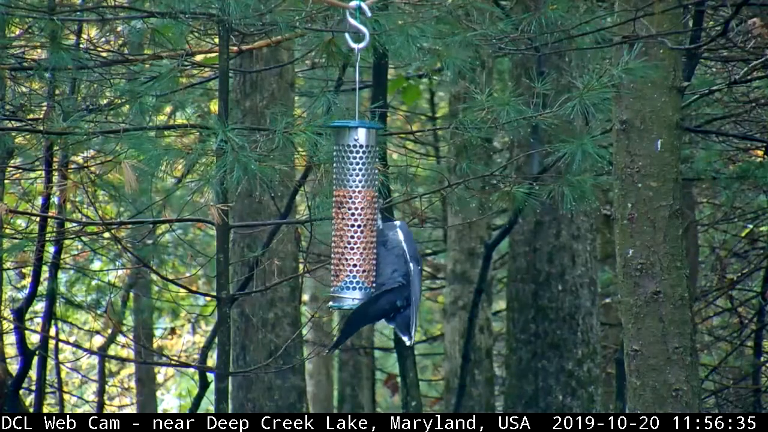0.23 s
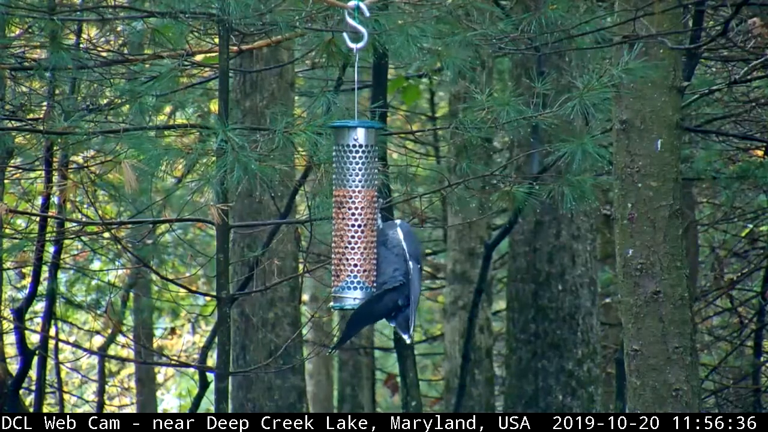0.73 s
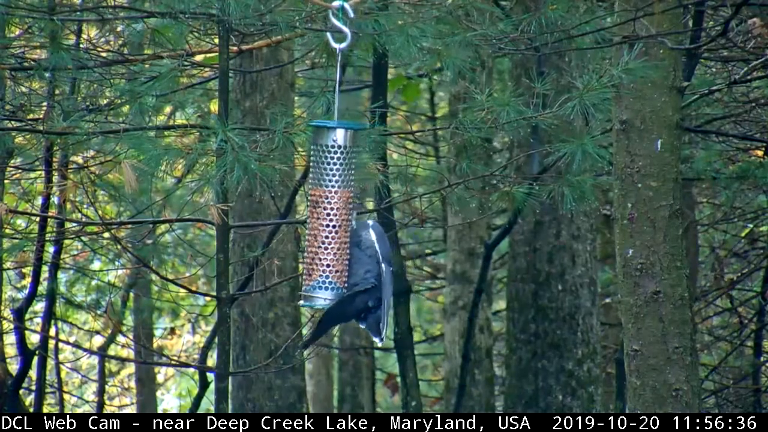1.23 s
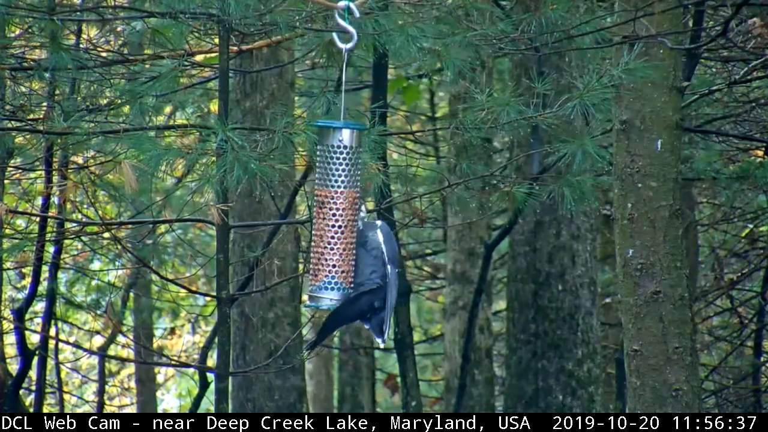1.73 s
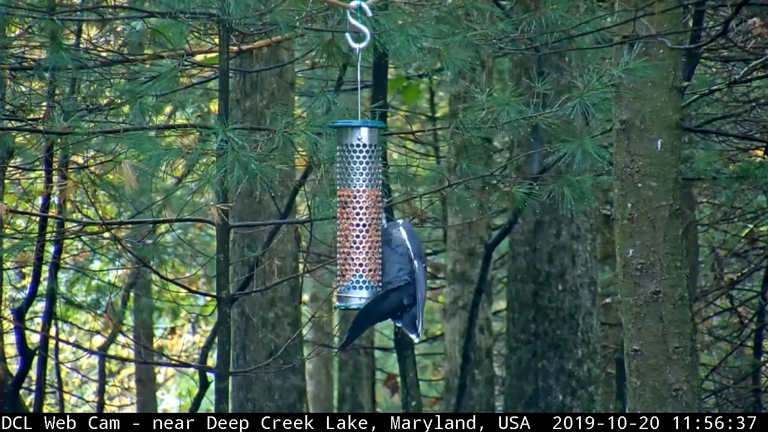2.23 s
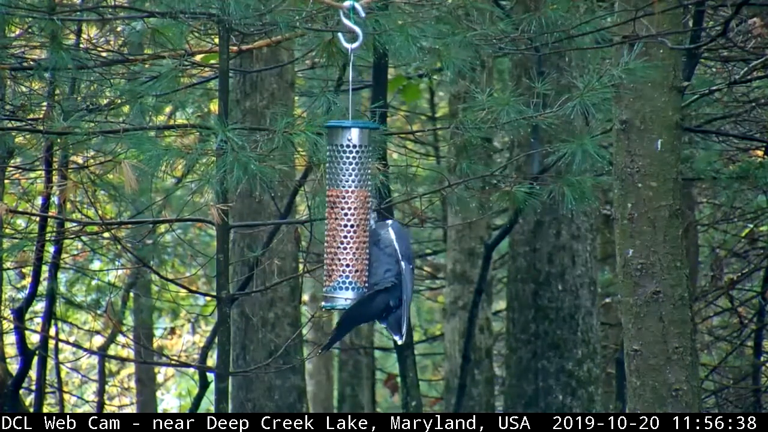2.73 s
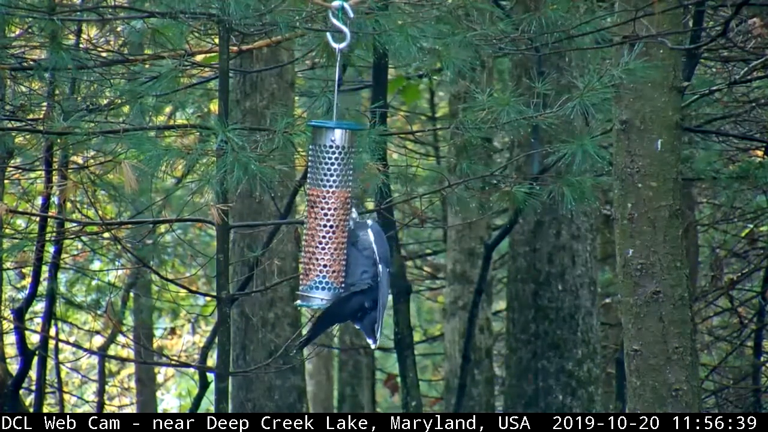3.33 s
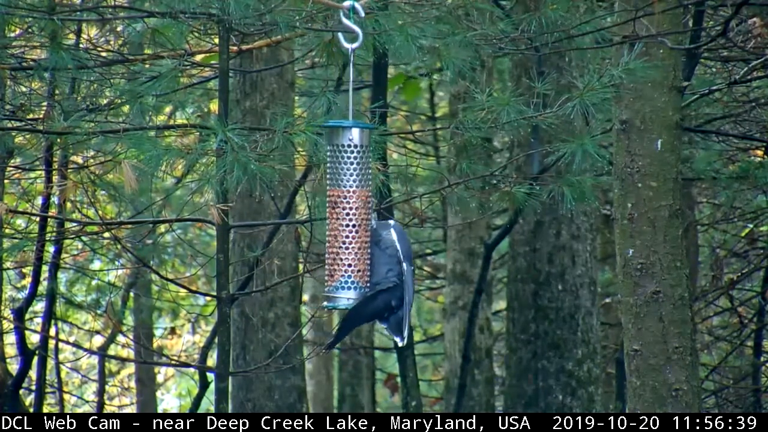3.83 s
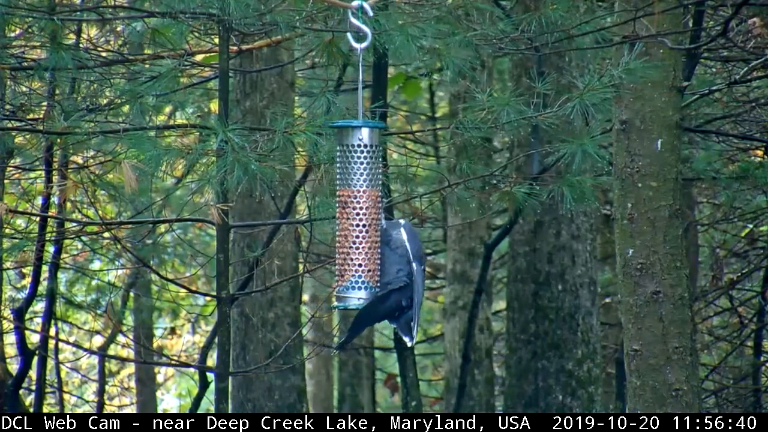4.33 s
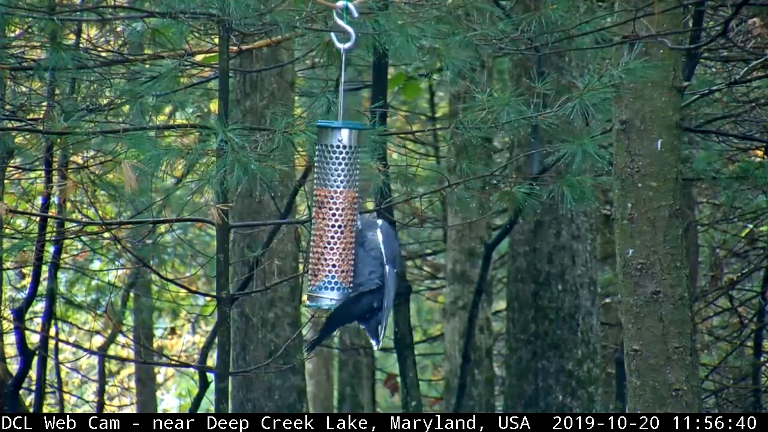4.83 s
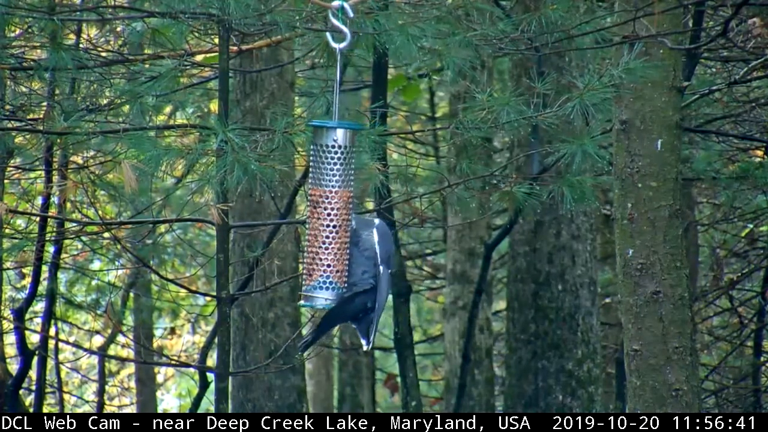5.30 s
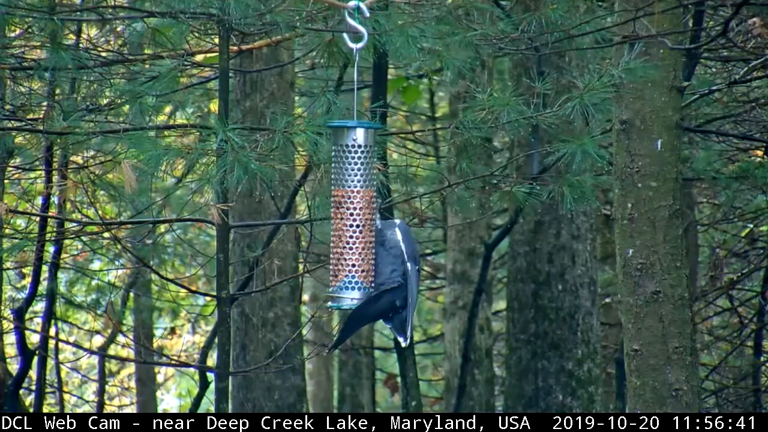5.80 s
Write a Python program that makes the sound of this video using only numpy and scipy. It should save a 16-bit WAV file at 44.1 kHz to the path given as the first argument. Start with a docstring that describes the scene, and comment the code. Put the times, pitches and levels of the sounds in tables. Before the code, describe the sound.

In a quiet wood, a woodpecker clinging to a metal mesh feeder pecks irregularly at pellets. One sharp metallic click stands out near one second, with mostly faint crunchy ticks and claw scrapes afterwards. Two clear, thin, falling chips from a small bird echo off the trunks around three and four seconds. A firm peck comes at the end. A steady low hum, rumble and soft hiss lie beneath, heard through a slightly dull single microphone.

```python
"""A woodpecker on a metal mesh feeder pecks at pellets and shuffles its grip in a quiet wood:
strikes ring damped modes and crumble noise, scrapes are runs of tiny slips, loose pellets clatter.
A small bird gives thin, falling chips, gliding tones that the tree trunks throw back.
Under it lie low rumble and hiss of shaped noise, and a low hum with a thin whine.
One band-limited microphone channel feeds both sides."""
import sys
import numpy as np
from scipy import signal
from scipy.fft import rfft, irfft
from scipy.io import wavfile

SR = 44100
rng = np.random.default_rng(int(sys.argv[2]) if len(sys.argv) > 2 else 0)


def wrap_up_sound(samples):
    """Save the sound to the file named by the first command line argument, as 16-bit audio."""
    columns = np.atleast_2d(samples).T
    # keep every value between -1 and 1, then stretch to whole-number steps
    tamed = np.clip(columns, -1, 1)
    steps = np.round(tamed * 32767).astype(np.int16)
    wavfile.write(sys.argv[1], SR, steps)


N = 267290


def amp(db):
    """Decibels to gain."""
    return 10 ** (np.asarray(db) / 20)


def evened(x):
    """Scales to rms 1."""
    return x / np.sqrt(np.mean(x ** 2) + 1e-20)


def add(mix, start_s, sound):
    """Mixes a sound in at start_s, cut at the end of the mix."""
    part = mix[max(round(start_s * SR), 0):][:len(sound)]
    part += sound[:len(part)]


def coloured(x, points):
    """Filters x by a curve of (f/Hz, gain/dB) points over log frequency, then scales to rms 1."""
    hz, db = np.transpose(points)
    bins_hz = np.fft.rfftfreq(len(x), 1 / SR) + 1  # +1 avoids log(0)
    gain = amp(np.interp(np.log(bins_hz), np.log(hz), db))
    return evened(irfft(rfft(x) * gain, len(x)))


def drift(rate_hz):
    """Random motion of rms 1: straight lines between rate_hz random knots per second."""
    t = np.arange(N) / SR
    knots = np.arange(0, t[-1] + 1, 1 / rate_hz)
    return evened(np.interp(t, knots, rng.standard_normal(len(knots))))


def scattered(start_s, end_s, per_s, level_db, spread_db=3):
    """Light contacts, one at random within each even slot: rows of (t/s, level/dB)."""
    slots = np.arange(start_s, end_s, 1 / per_s)
    late, size = rng.random((len(slots), 2)).T
    levels_db = level_db + spread_db * (2 * size - 1)
    return list(zip(slots + late / per_s, levels_db))


def pecks(crumble_s=0.00027):
    """Each strike crumbles a pellet and rings the damped mesh; the spot it lands on favours one pitch."""
    # bill strikes: t/s, ring level/dB, crunch level/dB, crunch t60/s, favoured f/Hz,
    # fall-off around it/(dB per octave)
    strikes = [(0.2526, -53, -45, 0.015, 6400, 24), (0.467, -50, -48, .026, 6640, 28),
               (.4965, -57, -53, .02, 5300, 13), (.8638, -57, -50.5, 0.05, 6600, 22),
               (1.0415, -61, -56, 0.16, 7000, 21), (1.0783, -48, -49, .02, 6000, 20),
               (1.0829, -21.5, -44, 0.065, 5800, 1.5), (2.128, -56, -49, .03, 6500, 7),
               (2.163, -60, -55.5, .035, 7200, 25), (3.354, -55, -48.5, 0.03, 3800, 14),
               (3.3857, -55, -50.5, 0.048, 2900, 8), (3.3895, -49, -46, .03, 5000, 7),
               (3.438, -58, -51.5, .04, 4700, 9), (3.544, -54, -45, .02, 6400, 22),
               (3.550, -58, -52, 0.065, 6200, 19), (3.845, -62, -57, 0.07, 6200, 23),
               (4.4986, -61, -57, .04, 6500, 16), (4.759, -62, -58.5, 0.073, 6200, 25),
               (4.938, -60, -55, 0.06, 6000, 15), (5.699, -58, -57, .03, 5700, 24),
               (5.779, -60, -56.5, .085, 6500, 24), (6.0472, -33, -41, 0.025, 6500, 27)]
    # modes of the mesh tube full of pellets, the briefest only a sharp click at the onset:
    # f/Hz, relative level/dB, t60/s
    mesh_modes = [(980, -18.5, 0.016), (1300, -11, 0.023), (1538, -11, 0.026), (1980, -13.5, 0.018),
                  (2760, -15, 0.014), (3140, -28, 0.026), (4180, -21.5, 0.014), (4460, -15, 0.035),
                  (4870, -1, 0.016), (5030, -7, 0.008), (5200, -20, 0.04), (5450, -10.5, 0.034),
                  (5780, -9, 0.022), (6045, -7.5, 0.03), (6150, 2.5, 0.0027), (6750, -15, 0.028),
                  (7230, -23, .03)]
    # colour of a pellet cracking under the bill: f/Hz, gain/dB
    crack_colour = [(300, -8.5), (1500, 1.5), (2700, -3.5), (3800, -5), (5300, 2), (6500, 2), (7700, -4)]
    # faint nibbling throughout
    ticks_per_s, tick_db, tick_t60_s, tick_hz, tick_focus_db_per_oct = 1.8, -65.5, .05, 6300, 27

    t = np.arange(SR // 8) / SR
    hz, db, t60_s = np.transpose(mesh_modes)
    signs = (-1) ** np.arange(len(hz))  # neighbouring modes swing in opposite directions
    decays = amp(-60 * t / t60_s[:, None])
    modes = signs[:, None] * np.sin(2 * np.pi * hz[:, None] * t) * decays
    ticks = [(s, level_db, level_db, tick_t60_s, tick_hz, tick_focus_db_per_oct)
             for s, level_db in scattered(0, N / SR, ticks_per_s, tick_db)]
    bins_hz = np.fft.rfftfreq(len(t), 1 / SR) + 1
    out = np.zeros(N)
    for s, ring_db, crunch_db, crunch_t60_s, spot_hz, focus in strikes + ticks:
        gains = amp(db - focus * abs(np.log2(hz / spot_hz)))
        ring = gains @ modes / np.linalg.norm(gains)
        spot_gain = amp(-focus * abs(np.log2(bins_hz / spot_hz)))
        grit = irfft(rfft(rng.standard_normal(len(t))) * spot_gain, len(t))
        onset = -np.expm1(-t / crumble_s)
        crunch = coloured(grit, crack_colour) * amp(-60 * t / crunch_t60_s) * onset
        add(out, s, amp(ring_db) * ring + amp(crunch_db) * crunch)
    return out


def scrapes(slips_per_s=4000, grit_db=-4):
    """Claws and bill on metal: a run of tiny slips over grit noise that starts quickly and fades."""
    # scrapes: t/s, length/s (peak at a third), level/dB
    slides = [(2.786, 0.035, -54), (2.814, 0.15, -61), (3.137, 0.031, -57.5), (3.418, 0.027, -56),
              (3.525, 0.15, -60.5), (3.829, 0.043, -57.5), (4.198, 0.023, -54.5), (4.323, 0.0157, -57),
              (4.495, 0.075, -58), (5.308, .04, -57.5), (5.411, 0.051, -60)]
    # colour of a scrape: f/Hz, gain/dB
    scrape_colour = [(400, -3.5), (1500, -5), (3100, -0.5), (4000, -5.5), (5500, 2), (7500, -9.5)]
    # faint rustles while the bird shifts its grip
    restless_from_s, restless_to_s = 1.95, 5.3
    rustles_per_s, rustle_db, rustle_s = 4, -64, .09

    contacts = scattered(restless_from_s, restless_to_s, rustles_per_s, rustle_db)
    rustles = [(s, rustle_s, db) for s, db in contacts]
    out = np.zeros(N)
    for s, length_s, level_db in slides + rustles:
        slips, grit = rng.standard_normal((2, SR // 4))
        slips = evened(slips * (rng.random(len(slips)) < slips_per_s / SR))
        u = np.arange(len(slips)) / SR / (length_s / 3)
        envelope = u * np.exp(1 - u)
        rasp = coloured(slips + amp(grit_db) * grit, scrape_colour)
        add(out, s, amp(level_db) * envelope * rasp)
    return out


def knocks(t60_s=0.08, width_hz=420):
    """Loosened pellets jostle in the tube: a brief clatter in one broad resonance."""
    # pellet shifts: t/s, starting level/dB, resonance f/Hz
    shifts = [(2.025, -56, 2950), (3.387, -55, 1800), (4.3195, -53, 3200)]
    t = np.arange(SR // 8) / SR
    out = np.zeros(N)
    for s, level_db, hz in shifts:
        b, a = signal.iirpeak(hz, hz / width_hz, fs=SR)
        clatter = signal.lfilter(b, a, rng.standard_normal(len(t)))
        add(out, s, evened(clatter) * amp(level_db - 60 * t / t60_s))
    return out


def chips():
    """A thin, quivering tone holds high, then drops ever faster; returns direct sound and feed to the trees."""
    # chips: t/s, length/s, top f/Hz, fall/Hz, power of the fall's bend, peak level/dB,
    # direct gain (0-1), tail from the trees/dB
    calls = [(0.169, .06, 7260, 1100, 2.3, -60, 0.26, -4), (1.257, 0.061, 7200, 1020, 1.6, -54, 0.24, -7),
             (2.9135, 0.038, 7586, 1600, 2.1, -37, 0.87, -5.5),
             (4.1965, 0.040, 7360, 1105, 2.2, -35.5, 0.99, -12)]
    # swell to a peak, then fade
    peak_share, rise_db, fade_db, rounding = .34, 20, 17.5, 1.1
    # pitch and level quiver more as the note falls
    quiver_per_s, quiver_hz, quiver_db = 270, 100, 2

    direct, to_trees = np.zeros((2, N))
    for s, length_s, top_hz, fall_hz, bend, peak_db, share, trees_db in calls:
        u = np.arange(0, length_s, 1 / SR) / length_s
        quiver = u * drift(quiver_per_s)[:len(u)]
        hz = top_hz - fall_hz * u ** bend + quiver_hz * quiver
        rising = np.interp(u, [0, peak_share], [1, 0])
        fading = np.interp(u, [peak_share, 1], [0, 1])
        db = peak_db - rise_db * rising ** rounding - fade_db * fading ** rounding
        db = db + quiver_db * quiver
        tone = np.sqrt(2) * np.sin(2 * np.pi * np.cumsum(hz) / SR)
        note = tone * amp(db) * signal.windows.tukey(len(u), .1)
        add(direct, s, share * note)
        add(to_trees, s, amp(trees_db) * note)
    return direct, to_trees


def trunk_echoes(x):
    """Each nearby trunk returns one distinct, slightly late copy."""
    # single trunks: least delay/s, gain/dB
    trunks = [(.0105, -15), (.0185, -10), (.0245, -7), (.038, -17), (.051, -17), (.0775, -16.5)]
    out = np.zeros(N)
    for (delay_s, db), stray in zip(trunks, rng.random(len(trunks))):
        add(out, delay_s + stray * 0.0003, amp(db) * x)
    return out


def forest(x, t60_s, build_s):
    """Branches and farther trunks scatter a thin tail: sparse random taps of unit total energy."""
    t = np.arange(SR) / SR
    taps = rng.choice([-1., 1.], SR) * (rng.random(SR) < 2000 / SR)
    tail = taps * amp(-60 * t / t60_s) * -np.expm1(-t / build_s)
    return signal.fftconvolve(x, tail / np.linalg.norm(tail))[:N]


def background(waver_db=0.5, sway_rad=.45, rumble_hz=110):
    """Shaped noise split into swelling rumble and steady hiss, plus tones wavering in phase and level."""
    # colour of rumble and hiss: f/Hz, relative density/dB
    air_colour = [(4, -77), (22, -63.5), (55, -63.5), (70, -72), (83, -64), (94, -76.5), (125, -75.5),
                  (150, -79), (172, -77.5), (190, -82), (600, -89.5), (880, -90.5), (1300, -94),
                  (2100, -96.5), (2950, -97), (3800, -99.7), (4900, -99.7), (5800, -98.5), (7000, -99),
                  (7400, -102), (7700, -110)]
    # low hum and thin whine: f/Hz, rms level before waver/dB
    hum_tones = [(59.4, -52), (119, -76.5), (177, -72), (2913, -86)]
    # swell of the rumble: t/s, gain/dB
    rumble_swell = [(0, -0.5), (2, 0), (3, 1), (4.2, -1), (5.1, 1.5), (6, 0)]
    air_db = -46  # rms before the swell

    t = np.arange(N) / SR
    sway = sway_rad * drift(3.5)
    hum = np.zeros(N)
    for hz, db in hum_tones:
        phase = 2 * np.pi * (hz * t + rng.random()) + sway
        hum += np.sqrt(2) * amp(db) * np.sin(phase)
    air = amp(air_db) * coloured(rng.standard_normal(N), air_colour)
    low_pass = signal.butter(2, rumble_hz, fs=SR, output="sos")
    rumble = signal.sosfiltfilt(low_pass, air)
    hiss = air - rumble
    swell = amp(np.interp(t, *np.transpose(rumble_swell)))
    return hiss + rumble * swell + hum * amp(waver_db * drift(6.8))


def scene():
    """Fairly dry feeder, chips with trunk echoes and a longer forest tail, and background."""
    feeder = pecks() + scrapes() + knocks()
    feeder = feeder + amp(-13.5) * forest(feeder, t60_s=0.11, build_s=0.0055)
    direct, to_trees = chips()
    bird = direct + trunk_echoes(direct) + forest(to_trees, t60_s=0.65, build_s=0.014)
    mono = feeder + bird + background()
    return np.array([mono, mono])


def record(dry):
    """Band-limited microphone channel: a steep linear-phase low-pass."""
    edge_hz = 7650
    low_pass = signal.firwin(701, edge_hz, window=("kaiser", 8), fs=SR)
    return signal.oaconvolve(dry, low_pass[None], "same")


dry = scene()
out = record(dry)
wrap_up_sound(out)
```